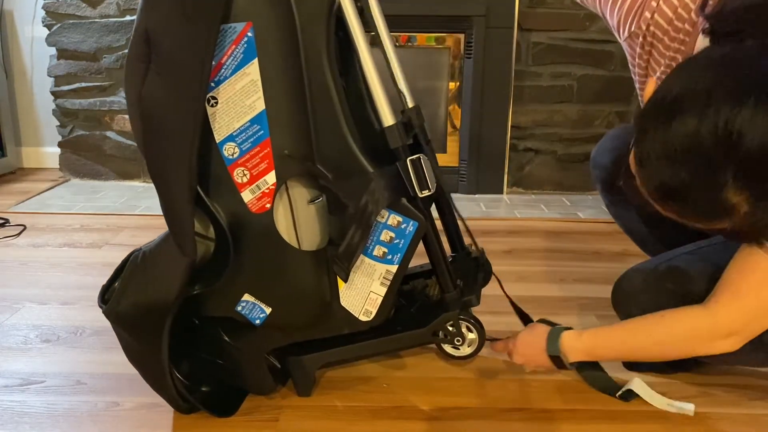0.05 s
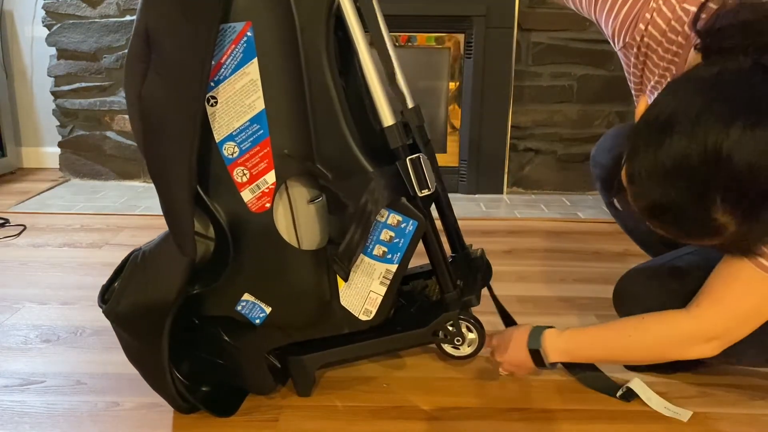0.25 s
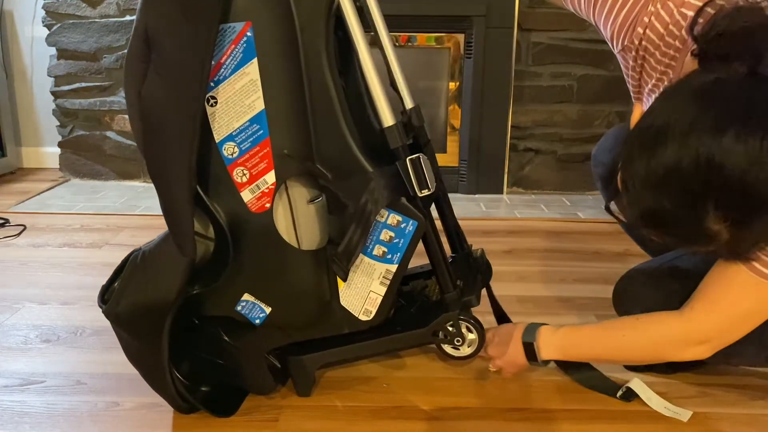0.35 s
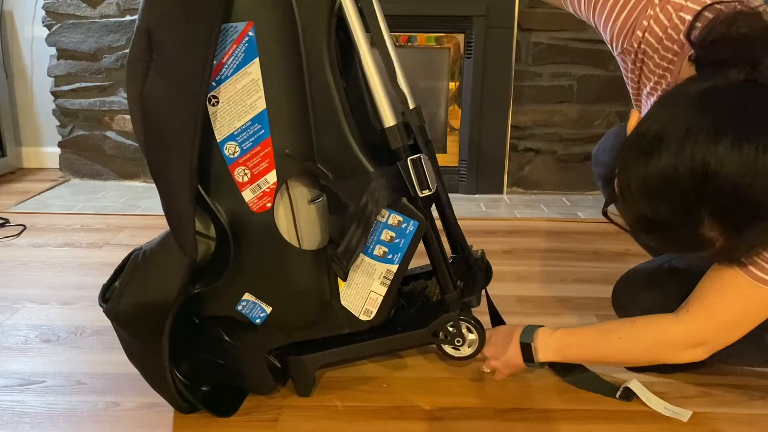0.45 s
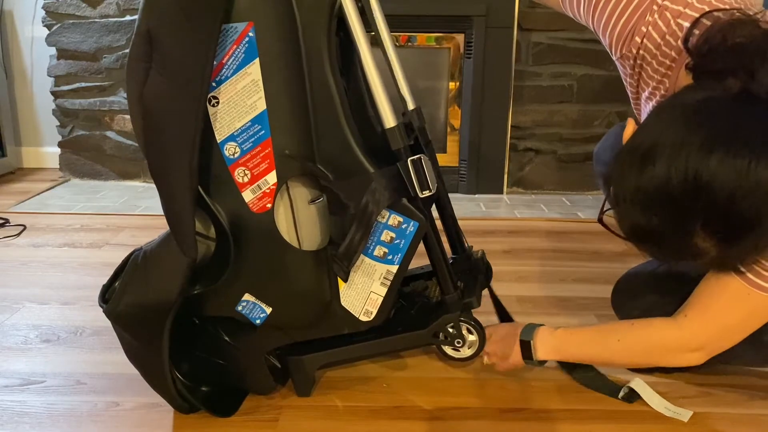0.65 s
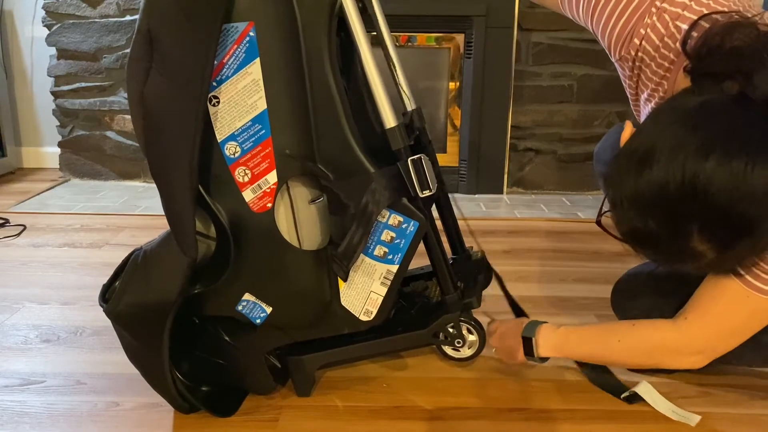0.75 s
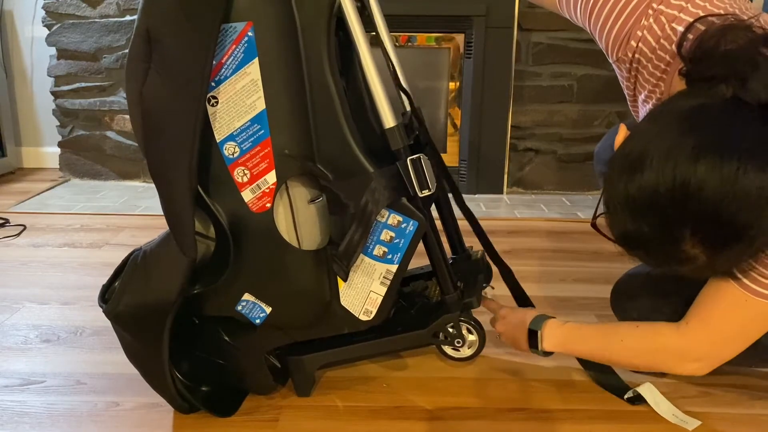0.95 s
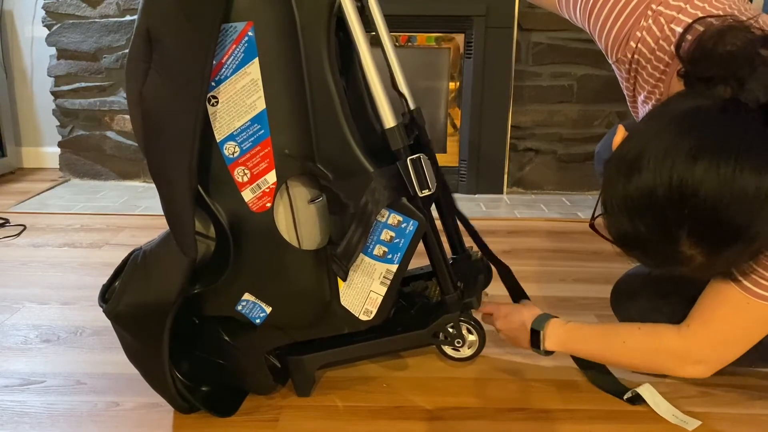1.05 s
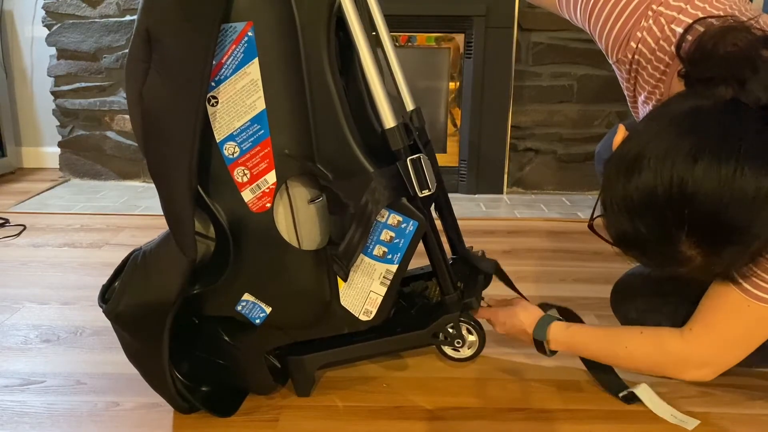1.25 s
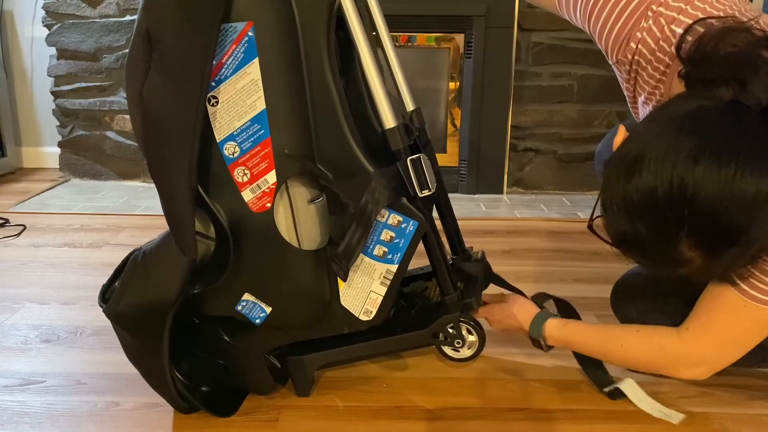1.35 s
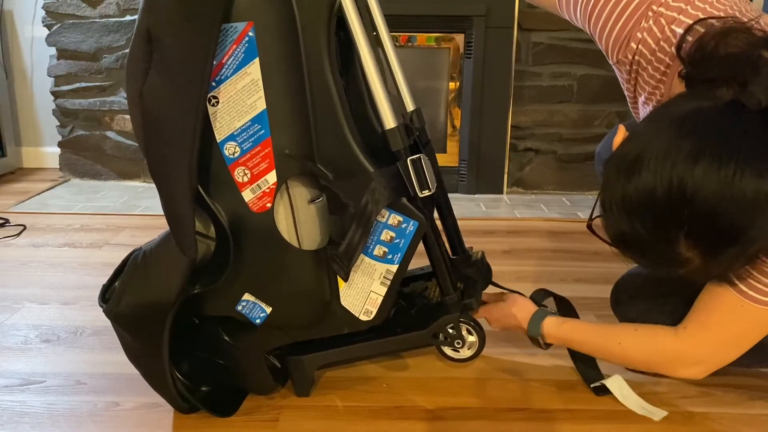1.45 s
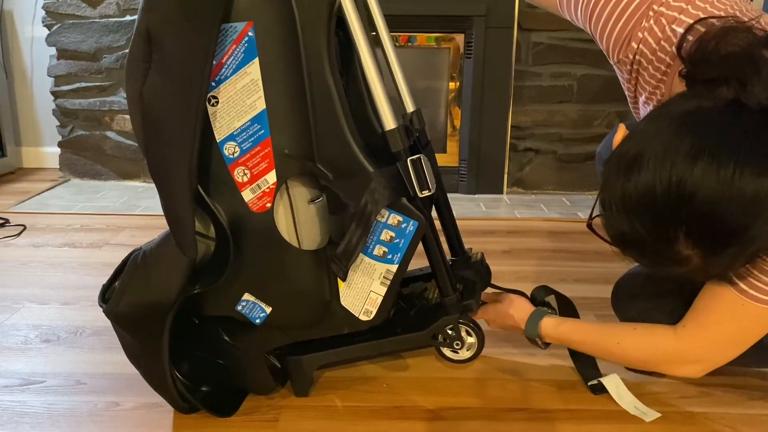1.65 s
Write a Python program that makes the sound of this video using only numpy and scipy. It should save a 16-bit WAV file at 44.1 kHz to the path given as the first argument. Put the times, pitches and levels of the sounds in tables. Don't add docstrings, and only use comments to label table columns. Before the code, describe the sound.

A metal strap hook knocks on a cart's axle and hollow frame, close up in a hard-floored room. After faint strap rustle, a sharp clustered clack lands at 0.24 seconds. Soft sliding leads to a lighter click and bright scrape at 0.63, small ticks come around 0.94 to 1.04, then firm double knocks at 1.24 and 1.28. Short echoes fade into very low room rumble.

```python
import sys
import numpy as np
from scipy import signal
from scipy.io import wavfile

SR = 44100
rng = np.random.default_rng(int(sys.argv[2]) if len(sys.argv) > 2 else 0)


def voltage_ratio(level):
    return 10 ** (np.asarray(level, float) / 20)


def file_out(sig):
    cols = np.atleast_2d(sig).T
    lim = np.clip(cols, -1, 1)
    pcm = np.round(lim * 32767).astype(np.int16)
    wavfile.write(sys.argv[1], SR, pcm)


N = 74970
LEAD_IN = 8820
EDGES_HZ = 20 * 2 ** np.arange(0, 9.8, .5)

# pitch_hz, level_db
RUMBLE_COLOUR = [(12, -39), (20, -17), (91, 5.5), (240, -10.5), (497, -12.5), (1050, -23), (1510, -38),
                 (1640, -28), (2500, -45), (3250, -30), (5500, -120)]
RUMBLE_DB = -64.5
# pitch_hz, likeness (-1 to 1)
RUMBLE_LIKENESS = [(60, 0.88), (180, 0.67), (550, -0.25), (1650, -0.1), (4970, 0.29), (15000, 0.08)]
# pitch_hz, level_db, width_hz
DRONE = [(59.3, -68, 4.8), (86, -76.5, 8.5), (224, -70, 28)]

# time_s, level_db
WEBBING_PULL = [(0.0, -73.5), (0.118, -97.5), (0.288, -70.5), (0.41, -108), (0.544, -78.5), (0.742, -82),
                (1.376, -80.5), (1.424, -85), (1.562, -99.5), (1.7, -89)]
# pitch_hz, level_db (per Hz)
WEBBING_COLOUR = [(400, -27), (1000, -14), (2500, -3.5), (4000, -7), (7000, -11.5), (10500, -27.5),
                  (15000, -8)]
PULL_TRIM_DB, GRAIN_DB = -1, -1.5

# start_s, level_db, centre_oct (above 1 kHz), spread_oct, chatter_ms
CONTACTS = [(-0.120, -44.5, 2.5, 1.8, 1.9), (0.0883, -53, 3.0, 0.62, 1.2), (0.2070, -58, -0.5, 0.72, 3.3),
            (0.2378, -24, 2, 1.19, 2.2), (0.2425, -25, -0.06, 0.72, .8), (0.2538, -28, 1.73, 1.5, 2.2),
            (0.2585, -25.5, -0.08, 0.95, 0.77), (0.6298, -32.5, 2, 0.49, 1.9),
            (0.6342, -35.5, -0.13, 1, 0.61), (0.9393, -36.5, 0.58, 0.82, 0.68),
            (0.9478, -46, 2.25, 0.27, 2.5), (0.9560, -44, 1.5, 1.16, 9.6), (1.0393, -42, 4, 1, 3),
            (1.0480, -67, 6.5, 0.12, 19), (1.2396, -29, 2.0, 0.96, 1.6), (1.2435, -27.5, -0.6, 0.65, 1.77),
            (1.2490, -40, 0.9, 0.77, 2.4), (1.2812, -21.5, 0.1439, 1.023, 0.32),
            (1.2830, -32, 1.54, 0.31, 0.33), (1.2910, -35, -1, 1.03, 2.0), (1.3867, -54.5, 3.8, 0.33, 2.0)]
# start_s, level_db, centre_oct (above 1 kHz), spread_oct, chatter_ms
SLIDES = [
    (0.43, -43, 1.76, 0.3, 35.0),
    (0.6320, -36, 2.34, 0.28, 70),
    (0.9580, -45, 2.5, 0.9, 10.0),
    (0.2385, -35.5, 3, 0.44, 1.3),
    (1.2400, -45.5, 3.5, 1, 1.2),
    (0.53, -43, -0.2, 0.83, 50.0),
]
# pitch_hz, level_db, t60_s
HOOK_MODES = [(2478, 4, 0.0071), (2975, 0.5, .02), (3360, 0.5, 0.015), (5244, 4, 0.0071),
              (5920, -5.5, 0.013), (6390, -2.5, 0.013), (7745, -3.5, .006), (9700, -0.5, .006),
              (10730, -5.5, 0.0062), (15000, -6.5, .005)]
# pitch_hz, level_db, t60_s
AXLE_MODES = [(3590, -3.5, 0.0099), (4093, -2, .02), (4516, -2.5, 0.011), (4990, -12, 0.022),
              (7226, -6.5, 0.0056)]
# pitch_hz, level_db, t60_s
FRAME_MODES = [(150, -3, 0.056), (269, -9, 0.12), (395, -3, 0.08), (586, -1, 0.028), (871.3, 3, 0.018),
               (1090, -4.5, 0.12), (1089.6, -3.5, 0.063), (1275, -3, 0.024), (1401, -1.5, 0.024),
               (1592, -5, 0.047), (1660, -2, 0.033), (1884, -0.5, 0.014), (2484, -19.5, 0.01),
               (2392, -1.5, 0.014)]
MODE_SCATTER_DB, CRACK_DB, TICKS_PER_S = 3, 6, 4600
SKIRT_DB, MAIN_TICK = 6.5, 3.9

# pitch_hz, t60_s
ROOM_T60 = [(200, 0.43), (530, 0.52), (1390, 0.61), (3680, 0.55), (9700, 0.5)]
# pitch_hz, level_db
ROOM_COLOUR = [(150, 0.5), (500, 0.5), (1500, -3), (4000, -6), (8000, -6.5), (15000, -12.5)]
# pitch_hz, likeness (-1 to 1)
ROOM_LIKENESS = [(60, 0.9), (150, 1), (380, 0.22), (950, -0.032), (2380, 0.11), (5980, 0.097),
                 (15000, 0.048)]
# delay_s, level_db
ECHOES = [
    (.0018, -5),
    (.0085, -16),
    (0.0161, -13),
    (.024, -15.5),
]
ROOM_DB, ROOM_ONSET_S, ROOM_BUILD_S = -28, 0.0023, 0.0027
LEFT_LEAD_S, PAN_DB = 3e-5, 1


def rms_one(x):
    return x / np.sqrt(np.mean(x ** 2) + 1e-20)


def at_hz(points, hz):
    table_hz, value = np.array(points).T
    return np.interp(np.log(hz), np.log(np.maximum(table_hz, 1)), value)


def drift(rate_hz):
    r = np.exp(-80 * np.pi * rate_hz / SR)
    slow = signal.lfilter([1], [1, -2 * r, r * r], rng.standard_normal(N // 40 + 2002))[2000:]
    return np.interp(np.arange(N) / 40, np.arange(len(slow)), rms_one(slow))


def ring(clicks, hz, t60):
    r = voltage_ratio(-60 / (max(t60, .003) * SR))
    w = 2 * np.pi * hz / SR
    return signal.lfilter([0, np.sin(w)], [1, -2 * r * np.cos(w), r * r], clicks + 1e-18)


def bands(likeness, gain_of_band):
    out = 0
    white = rng.standard_normal((2, 2, N + SR // 2))
    for k, (low, high) in enumerate(zip(EDGES_HZ, EDGES_HZ[1:])):
        sos = signal.butter(2, [low, high], "band", fs=SR, output="sos")
        mid, side = signal.sosfilt(sos, white[k % 2])[:, -N:]
        hz = np.sqrt(low * high)
        alike = np.clip(at_hz(likeness, hz), -1, 1)
        stereo = np.sqrt(1 + alike) * mid + np.sqrt(1 - alike) * side * [[1], [-1]]
        out = out + gain_of_band(hz) * stereo
    return out


def house():
    def rumble_gain(hz):
        treble_loss_db = 2 * max(np.log2(hz / 2500), 0)
        return voltage_ratio(at_hz(RUMBLE_COLOUR, hz) - treble_loss_db + 0.75 * drift(12))

    rumble = voltage_ratio(RUMBLE_DB) * rms_one(bands(RUMBLE_LIKENESS, rumble_gain))
    drone = 0
    for hz, db, width_hz in DRONE:
        line = ring(rng.standard_normal(N + SR), hz, 1.07 / width_hz)[SR:]
        drone = drone + voltage_ratio(db) * rms_one(line)
    return rumble + drone


def webbing():
    grain = drift(25)

    def friction_gain(hz):
        bass_loss_db = 12 * max(np.log2(500 / hz), 0)
        return voltage_ratio(at_hz(WEBBING_COLOUR, hz) - bass_loss_db + GRAIN_DB * grain)

    hiss = rms_one(bands(ROOM_LIKENESS, friction_gain))
    time_s, level_db = np.transpose(WEBBING_PULL)
    return voltage_ratio(np.interp(np.arange(N) / SR, time_s, level_db) + PULL_TRIM_DB) * hiss


def strike(ticks, centre, spread, mode_db, modes):
    off = (np.log2(modes[:, 0] / 1000) - centre) / spread
    drive = voltage_ratio(mode_db - SKIRT_DB * np.log2(1 + off ** 2))[:, None] * ticks
    edges_hz = 1000 * 2 ** (centre + np.array([-spread, spread]))
    low, high = np.clip(edges_hz, [50, 60], [17000, 19000])
    sos = signal.butter(2, [low, high], "band", fs=SR, output="sos")
    crack = voltage_ratio(CRACK_DB) * np.sqrt(2000 / (high - low)) * signal.sosfilt(sos, ticks + 1e-18)
    return np.vstack([drive, crack])


def cart():
    modes = np.array(HOOK_MODES + AXLE_MODES + FRAME_MODES)
    span = 20000
    scatter = rng.standard_normal((30, len(modes)))
    drive = np.zeros((2, len(modes) + 1, N + LEAD_IN))
    for k, (start_s, db, centre, spread, chatter_ms) in enumerate(CONTACTS + SLIDES):
        luck = rng.random((3, span))
        u = np.arange(span) / SR / (max(chatter_ms, .2) / 1000)
        hits = luck[0] < TICKS_PER_S / SR
        ticks = hits * np.log(luck[1] + 1e-9) * np.sign(luck[2] - .5)
        blow = np.arange(span) == int(.8 * chatter_ms * SR / 1000)
        ticks = (ticks + MAIN_TICK * blow) * u ** 2 * np.exp(-2 * u ** 2)
        ticks = ticks / np.sqrt(np.sum(ticks ** 2))
        far_ticks = ticks if chatter_ms > 6 else blow
        i = int(start_s * SR) + LEAD_IN
        reach = int(3 * chatter_ms * SR / 1000) + 1500
        mode_db = modes[:, 1] - 10 + MODE_SCATTER_DB * scatter[k]
        for path, train in enumerate((ticks, far_ticks)):
            push = voltage_ratio(db) * train[:reach]
            drive[path, :, i:i + reach] += strike(push, centre, max(spread, .05), mode_db, modes)
    out = drive[:, -1]
    for j, (hz, _, t60) in enumerate(modes):
        out = out + (-1) ** j * ring(drive[:, j], hz, t60)
    return out


def room(near, far):
    t = np.arange(N) / SR

    def decay(hz):
        return voltage_ratio(ROOM_DB + at_hz(ROOM_COLOUR, hz) - 60 * t / at_hz(ROOM_T60, hz))

    build = 1 - np.exp(-np.maximum(t - ROOM_ONSET_S, 0) / ROOM_BUILD_S)
    tail = build * bands(ROOM_LIKENESS, decay)
    early = np.zeros((2, N))
    skew = rng.integers(-12, 12, (len(ECHOES), 2))
    for (delay_s, db), (a, b) in zip([(0, 0.15)] + ECHOES, [(0, 0), *skew]):
        left, right = int(delay_s * SR) + a, int((delay_s + LEFT_LEAD_S) * SR) + b
        early[[0, 1], [left, right]] = voltage_ratio(db + PAN_DB * np.array([.5, -.5]))
    wet = signal.fftconvolve(near[None], early, axes=1) + signal.fftconvolve(far[None], tail, axes=1)
    return wet[:, LEAD_IN:LEAD_IN + N]


def scene():
    return house() + webbing() + room(*cart())


def band_limit(x):
    return signal.sosfilt(signal.butter(12, 16580, fs=SR, output="sos"), x)


def record(dry):
    x = signal.sosfilt(signal.butter(2, 40, "high", fs=SR, output="sos"), dry)
    port_hz, port_width_hz, port_db = 14200, 2830, 11.5
    port = signal.lfilter(*signal.iirpeak(port_hz, port_hz / port_width_hz, fs=SR), x)
    x = x + voltage_ratio(port_db) * port
    dead_band = signal.cheby2(6, 40, (12500, 13900), "bandstop", fs=SR, output="sos")
    x = signal.sosfilt(dead_band, x)
    return band_limit(x)


dry = scene()
out = record(dry)
file_out(out)
```